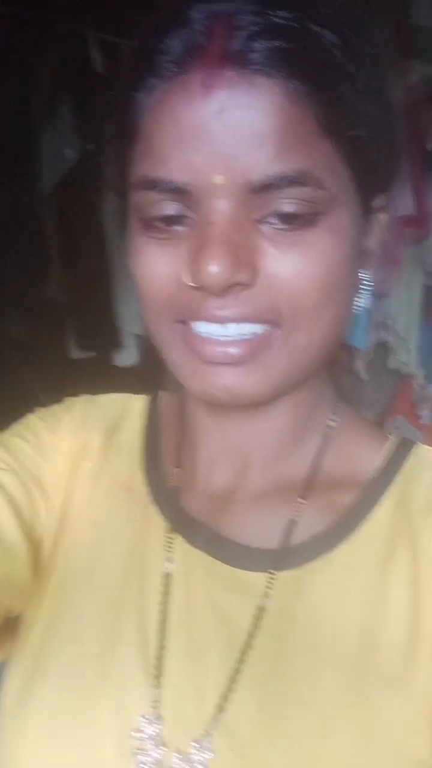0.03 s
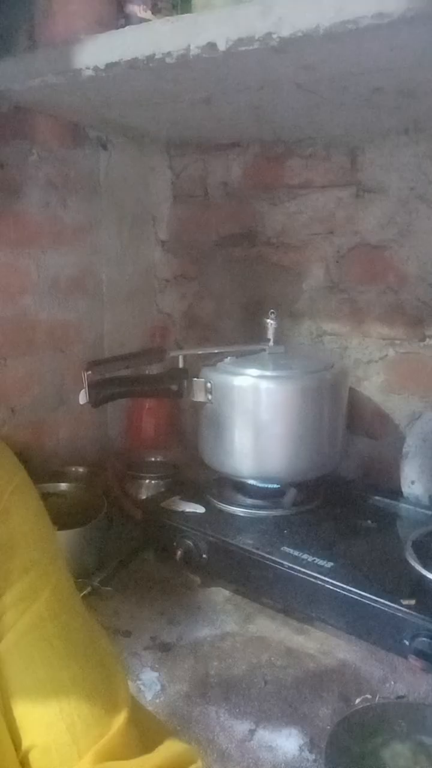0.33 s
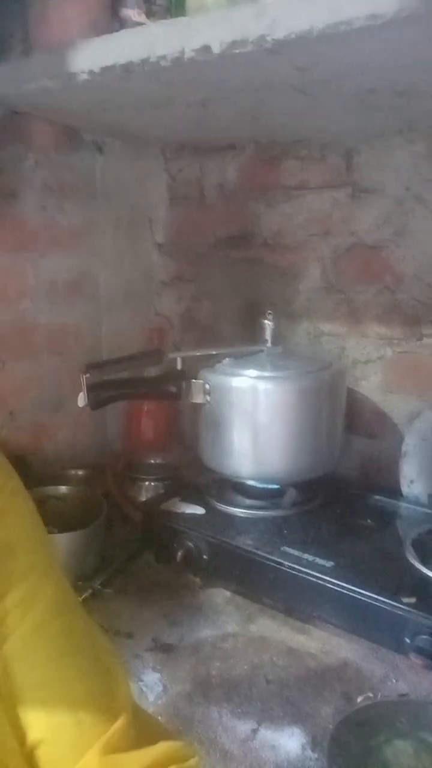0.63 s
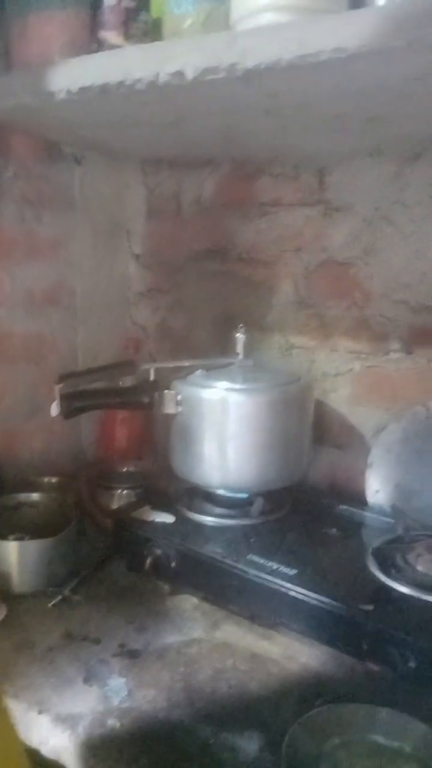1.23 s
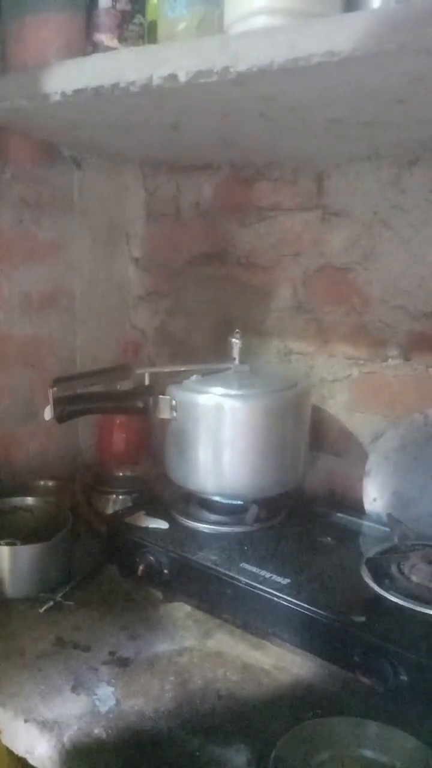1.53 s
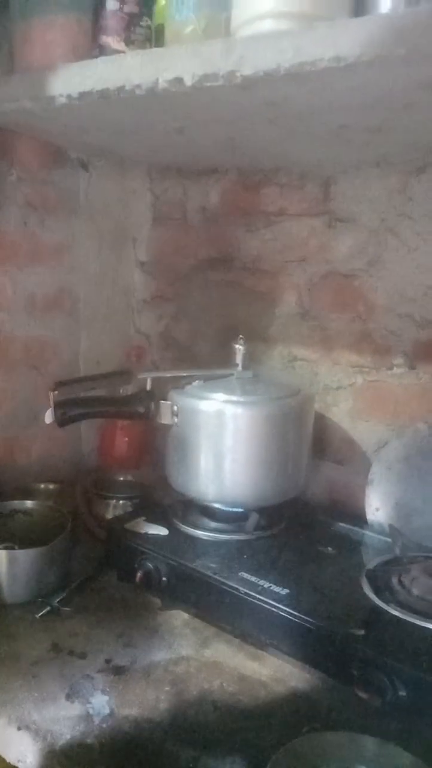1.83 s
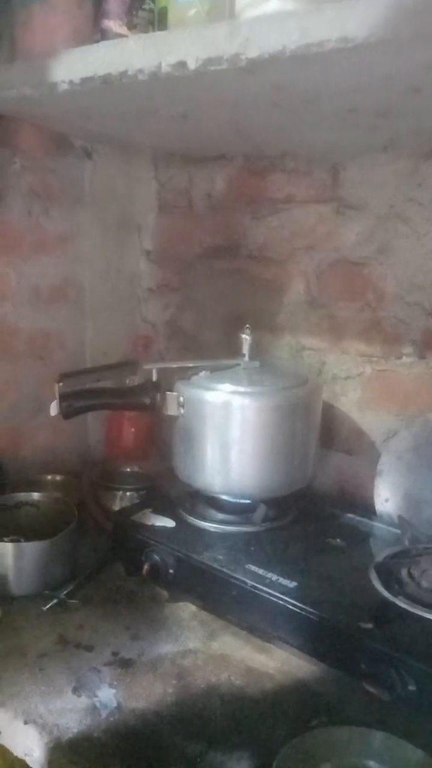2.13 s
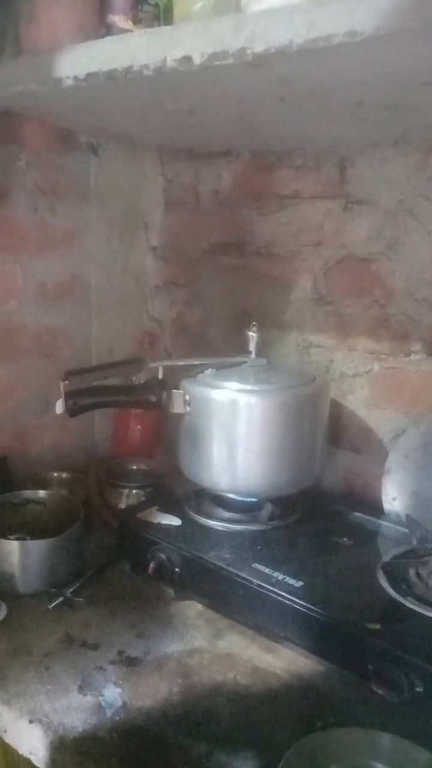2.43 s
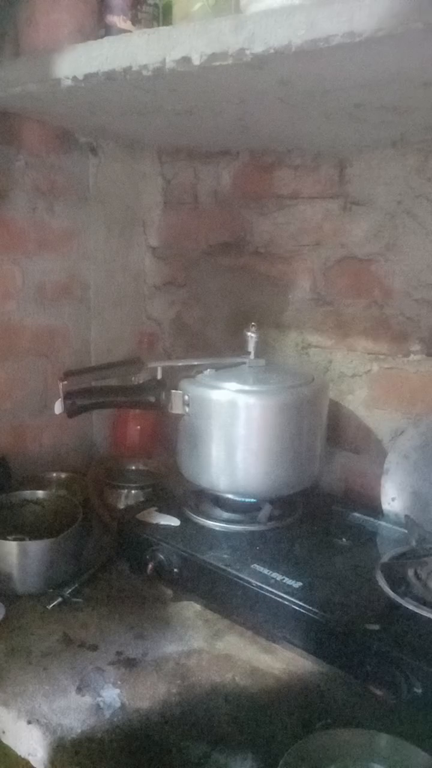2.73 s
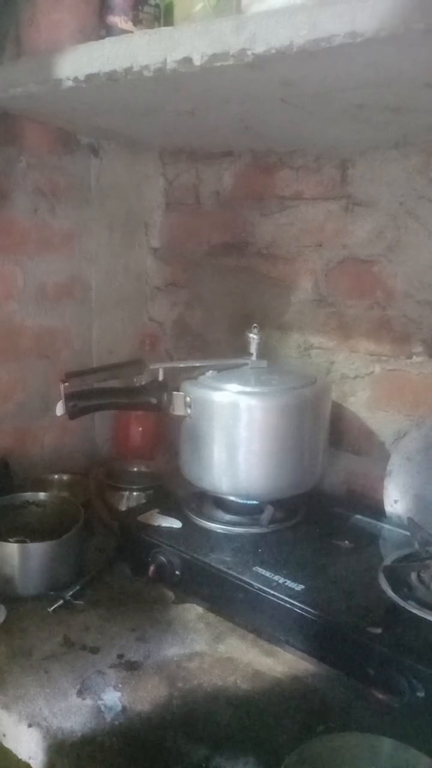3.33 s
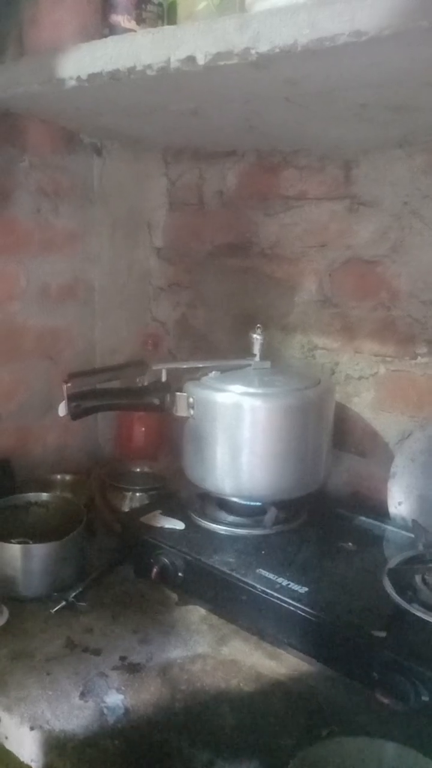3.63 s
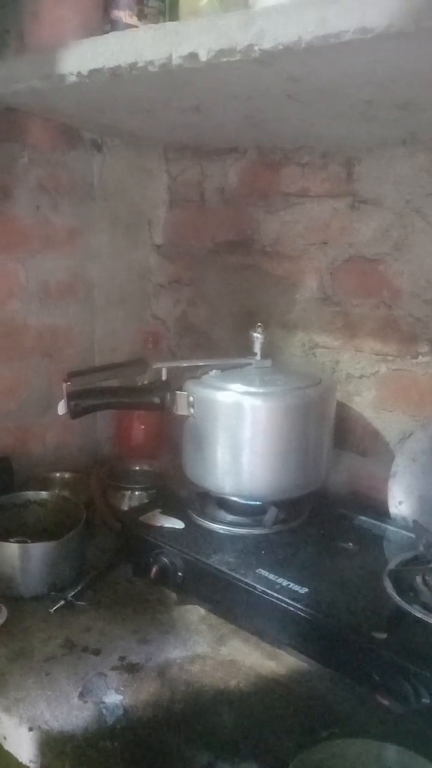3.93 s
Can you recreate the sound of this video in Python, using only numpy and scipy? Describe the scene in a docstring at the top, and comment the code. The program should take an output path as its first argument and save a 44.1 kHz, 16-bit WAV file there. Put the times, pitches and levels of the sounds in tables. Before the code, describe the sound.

A pressure cooker vents a loud, steady hiss of steam over low sputtering pops.

```python
"""A pressure cooker vents on a stove in a small brick kitchen, close to the microphone.
After a moment of faint room hiss and one light tick, the steam jet cuts in at full strength:
a bright hiss with narrow resonances, over irregular low pops that sputter in clusters."""
import sys
import numpy as np
from scipy import signal
from scipy.fft import rfft, irfft
from scipy.io import wavfile
from scipy.ndimage import uniform_filter1d

SR = 44100
rng = np.random.default_rng(int(sys.argv[2]) if len(sys.argv) > 2 else 0)


def dump(signal):
    """Clip the signal to [-1, 1] and save it as 16-bit WAV at the path in sys.argv[1]."""
    limited = np.clip(np.atleast_2d(signal).T, -1, 1)
    pcm = np.round(limited * 32767).astype(np.int16)
    wavfile.write(sys.argv[1], SR, pcm)


N = 176400

# loud pops (s, level of the crack dB, level of the thump dB)
POPS = [(0.189, -15, -15), (0.2062, -9, -11), (0.237, -11, -19),
        (0.2669, -9, -12), (0.2943, -9, -15), (0.3571, -8, -11), (0.4169, -8, -12),
        (0.4724, -11, -15), (0.4832, -3, -13), (0.4873, -11, -13), (0.5041, -4, -11), (0.5367, -7, -12),
        (0.5407, -7, -9), (0.5565, -5, -19), (0.6162, -9, -19), (0.6569, -12, -13), (0.6669, -3, -18),
        (0.6859, -7, -24), (0.7022, -10, -13), (0.724, -11, -16), (0.7608, -12, -11),
        (0.7883, -10, -15), (0.8444, -8, -10),
        (0.8507, -10, -14), (0.8555, -8, -18), (0.8749, -10, -15), (0.888, -7, -10), (0.9619, -9, -20),
        (1.029, -9, -16), (1.0596, -10, -17), (1.1056, -9, -14), (1.147, -4, -15), (1.231, -11, -17),
        (1.2759, -10, -13), (1.2872, -10, -16), (1.347, -12, -15),
        (1.4402, -7, -10), (1.4483, -12, -12), (1.4712, -7, -13), (1.5327, -10, -12),
        (1.608, -13, -16), (1.637, -12, -14), (1.719, -13, -16), (1.801, -10, -15), (1.864, -12, -15),
        (1.905, -5, -17), (1.9167, -10, -14), (1.9626, -6, -13), (1.9731, -6, -21), (1.9994, -8, -14),
        (2.0038, -6, -11), (2.0294, -7, -14), (2.0423, -3, -8), (2.065, -12, -17),
        (2.1277, -8, -13), (2.1655, -6, -20),
        (2.1792, -8, -13), (2.2056, -4, -19), (2.2159, -9, -16), (2.2452, -12, -14), (2.3156, -5, -10),
        (2.3598, -8, -18), (2.375, -5, -16), (2.4083, -11, -16), (2.4278, -7, -15),
        (2.4396, -5, -16), (2.4618, -6, -12), (2.5434, -7, -13), (2.5581, -9, -15),
        (2.5961, -9, -16), (2.6845, -10, -12), (2.701, -11, -17), (2.7155, -9, -20), (2.7395, -9, -16), (2.7525, -9, -17),
        (2.8091, -9, -15), (2.871, -9, -14), (2.9394, -4, -24), (3.021, -11, -16), (3.0398, -8, -14), (3.0923, -6, -18),
        (3.2114, -9, -16), (3.2428, -8, -21), (3.2536, -6, -8), (3.2825, -8, -12), (3.3098, 0, -11),
        (3.3148, -10, -14), (3.3235, -9, -19), (3.3344, -10, -12), (3.447, -13, -15),
        (3.5304, -9, -12), (3.5575, -9, -12),
        (3.585, -9, -13), (3.5966, -9, -14), (3.6015, -5, -12), (3.6165, -10, -13), (3.6264, -10, -13),
        (3.6752, -10, -12), (3.6925, -10, -15), (3.7252, -9, -14), (3.7604, -9, -18), (3.8397, -10, -17),
        (3.8549, -10, -7.5), (3.9134, -8, -11), (3.9184, -9, -11), (3.931, -12, -16),
        (3.975, -5, -16)]  # fixed
# colour of a pop (Hz, dB)
POP_COLOUR = [(25, 3), (42, 18), (60, 30.5), (80, 37.2), (125, 39.7), (200, 37.7), (320, 33.6), (450, 27.7), (700, 21.1), (1150, 21.4), (1900, 12.5), (2700, 10.5), (4200, -1), (9000, -49)]
THUMP_HZ, CRACK_HZ = 260, 680  # a pop's thump lies below the first, its crack above the second
SPUTTER_PER_S, SPUTTER_TOP_DB, SPUTTER_RANGE_DB, SPUTTER_THUMP_DB = 280, -12.8, 14, -5
CLUSTER_S, CLUSTER_SHARE = 0.066, 0.22  # small pops crowd round the loud ones
JET_ON_S, JET_ATTACK_S = 0.172, 0.0014
# hiss of the steam jet (Hz, dB per Hz)
JET = [(60, -40), (600, -19.5), (1300, -18.3), (2000, -19.5), (3000, -15.8), (3500, -12.0), (3950, -9.2), (4350, -11.3),
       (4700, -8.5), (5600, -7.5), (6400, -6.0), (7050, -8.5), (8100, -16.5), (8900, -20.5), (9300, -26.5),
       (9850, -18.0), (10400, -20.0), (10800, -16.5), (11400, -20.0), (12000, -13.0), (12900, -4.5), (13500, -5.0),
       (14100, 0.0), (14550, -6.0), (15300, -5.0), (15750, -9.5)]  # fixed
# narrow peaks and dips of the jet, which change as the microphone settles (Hz, width Hz, dB at first, dB later)
RESONANCES = [(3790, 34, 4.0, 4.5), (3995, 70, 3.5, 3.5), (4130, 90, 3.5, 3.0), (4745, 80, 3.0, 1.5),
              (4910, 120, -4.0, -1.0), (5015, 50, 3.5, 3.5), (5230, 97, -3.5, 4.0),
              (5432, 64, 6.0, 5.0), (5560, 80, -3.0, -2.5), (5960, 150, 7.0, -4.0), (6230, 80, -1.0, 7.5),
              (6940, 47, 2.0, 1.5),
              (7370.0, 184, -0.5, -4.5), (7520.0, 173, 6.0, 7.0), (7920.0, 123, 4.5, -1.0),
              (8680.0, 106, 4.5, 4.0), (9300.0, 352, 3.0, -2.5), (12620.0, 163, 1.5, -4.0),
              (14790.0, 172, 2.0, 7.0)]  # fixed
SETTLE_FROM_S, SETTLE_TO_S = 1.02, 1.62
SPLIT_HZ = 9500  # the hiss lies below, the fizz above
SWELL_DB, FLUTTER_DB, PATCH_DB, RIPPLE_DB = 0.2, 0.44, 0.4, 2.55
# low rush of the jet (Hz, dB per Hz)
ROAR = [(25, -18), (48, -6), (85, 8.5), (170, 0.8), (600, -19), (4000, -37)]
ROAR_DB = -36
# quiet room before the jet (Hz, dB per Hz)
ROOM = [(30, -30), (100, -11), (480, -13), (620, -25), (1100, -21), (2900, -29), (3980, -13), (4800, -32), (5500, -4), (6500, -3), (9300, -25), (14200, -8)]
ROOM_DB = -48
TICK_S, TICK_DB, TICK_RISE_S, TICK_T60_S = 0.137, -35, .004, 0.094
# colour of the tick (Hz, dB per Hz)
TICK = [(4500, -23), (5400, 5), (6800, 7), (9500, -24), (14000, -11)]
EDGE_HZ = 15740  # fixed
FRAME, HOP = 2048, 512  # fixed
HISS_DB, FIZZ_DB = -20.5, -16.6  # strength of the jet
# moments when the sputter pauses (s)
LULLS = [.385, .435, .94, 1.405, 1.562, 1.78, 1.843, 1.885, 2.915, 2.655]
LULL_S = .021
# one pop rings briefly (s, Hz, dB, t60 s)
RING = (3.9735, 1280, -9, .02)


def amp(db):
    """Decibels to gain."""
    return 10 ** (np.asarray(db) / 20)


def unit(x):
    """Scales to rms 1."""
    return x / np.sqrt(np.mean(x ** 2) + 1e-20)


def read(points, hz):
    """Reads a spectrum on a log-frequency axis."""
    f, value = np.transpose(points)
    return np.interp(np.log(hz + 1), np.log(f + 1), value)


def add(mix, s, sound):
    """Mixes a sound in at time s."""
    part = mix[max(round(s * SR), 0):][:len(sound)]
    part += sound[:len(part)]


def noise(colour):
    """Steady noise of the given colour, rms 1."""
    return unit(irfft(rfft(rng.standard_normal(N)) * amp(read(colour, np.fft.rfftfreq(N, 1 / SR))), N))


def drift(shape, size):
    """Smooth chance of rms 1, with a grain of the given size along each axis."""
    z = rng.standard_normal(shape)
    for axis, length in enumerate(size):
        z = uniform_filter1d(uniform_filter1d(z, length, axis), length, axis)
    return unit(z)


def pop(crack_db, thump_db, size=4096):
    """One pressure spike: a sudden push or pull, then a slow swing back."""
    hz = np.fft.rfftfreq(size, 1 / SR)
    gain = np.log(amp(read(POP_COLOUR, hz) + read([(THUMP_HZ, thump_db), (CRACK_HZ, crack_db)], hz)))
    causal = np.conj(signal.hilbert(np.r_[gain, gain[-2:0:-1]]))
    return irfft(np.exp(causal[:len(hz)]), size)


def sputter():
    """Loud single pops, with a crowd of small ones that thickens around them and stops in the lulls."""
    loud, crowd = np.zeros(N), np.zeros(N)
    for (s, crack_db, thump_db), sign in zip(POPS, rng.choice([-1, 1], len(POPS))):
        add(loud, s, sign * pop(crack_db, thump_db))
        add(crowd, s - CLUSTER_S / 2, amp(crack_db) * np.hanning(round(CLUSTER_S * SR)))
    share = np.clip(CLUSTER_SHARE, 0, 1)
    rate = SPUTTER_PER_S * activity() * (1 - share + share * crowd / crowd.mean())
    sizes = amp(SPUTTER_TOP_DB - SPUTTER_RANGE_DB * np.sqrt(rng.random(N))) * rng.choice([-1, 1], N)
    small = signal.oaconvolve(sizes * (rng.random(N) < rate / SR), pop(0, SPUTTER_THUMP_DB))[:N]
    return loud + small + ring()


def jet():
    """Turbulent steam through narrow resonances; near walls add a fine, slowly shifting ripple."""
    hz, t, z = signal.stft(rng.standard_normal(N), SR, nperseg=FRAME, noverlap=FRAME - HOP)
    settled = np.interp(t, [SETTLE_FROM_S, SETTLE_TO_S], [0, 1])
    field = read(JET, hz)[:, None] + PATCH_DB * drift(z.shape, size=(24, 4)) + RIPPLE_DB * drift(z.shape, size=(1, 70))
    for centre, width, first_db, later_db in RESONANCES:
        field = field + np.outer(1 / (1 + (2 * (hz - centre) / width) ** 2), first_db + (later_db - first_db) * settled)
    z = z * amp(field)
    low, out = (hz < SPLIT_HZ)[:, None], np.zeros(N)
    for band, level_db in ((low, HISS_DB), (~low, FIZZ_DB)):
        steam = unit(signal.istft(z * band, SR, nperseg=FRAME, noverlap=FRAME - HOP)[1][:N])
        out += steam * amp(level_db)
    return out * amp(SWELL_DB * drift(N, size=(1500,)) + FLUTTER_DB * drift(N, size=(120,)))


def room():
    """Faint high room hiss and one light tick."""
    age = np.maximum(np.arange(N) / SR - TICK_S, 0)
    tick = np.minimum(age / TICK_RISE_S, 1) * amp(TICK_DB - 60 * age / TICK_T60_S)
    return amp(ROOM_DB) * noise(ROOM) + tick * noise(TICK)


def roar():
    """Dull low rush of the jet between the pops."""
    return amp(ROAR_DB) * noise(ROAR)


def activity():
    """How busy the sputter is: 1, falling to 0 in the lulls."""
    t = np.arange(N) / SR
    return np.prod([1 - np.exp(-((t - s) / LULL_S) ** 2) for s in LULLS], axis=0)


def ring():
    """The short ring of one late pop."""
    s, hz, db, t60 = RING
    age = np.maximum(np.arange(N) / SR - s, 0)
    return amp(db) * np.exp(-np.log(1000) * age / t60) * np.sin(2 * np.pi * hz * age)


def scene():
    """The quiet room gives way abruptly to the venting cooker."""
    on = np.clip((np.arange(N) / SR - JET_ON_S) / JET_ATTACK_S, 0, 1)
    return ((1 - on) * room() + on * (jet() + roar() + sputter()))[None]


def record(dry):
    """Full-scale limit, then the band limit."""
    return signal.oaconvolve(np.clip(dry, -1, 1), signal.firwin(1023, EDGE_HZ, window=("kaiser", 9), fs=SR)[None], "same")  # fixed


dry = scene()
out = record(dry)
dump(out)
```